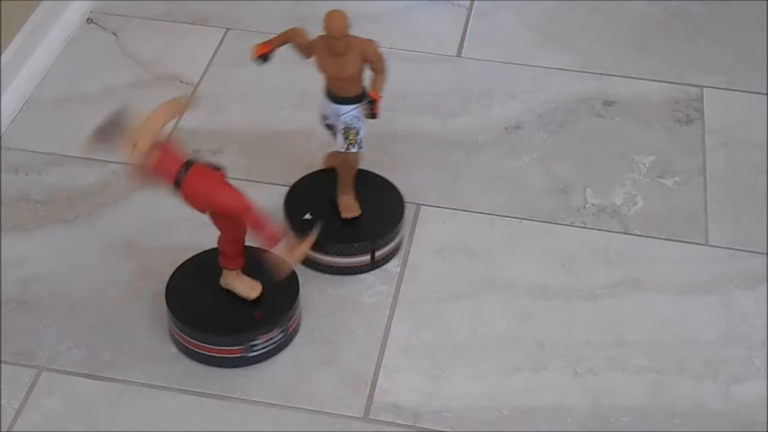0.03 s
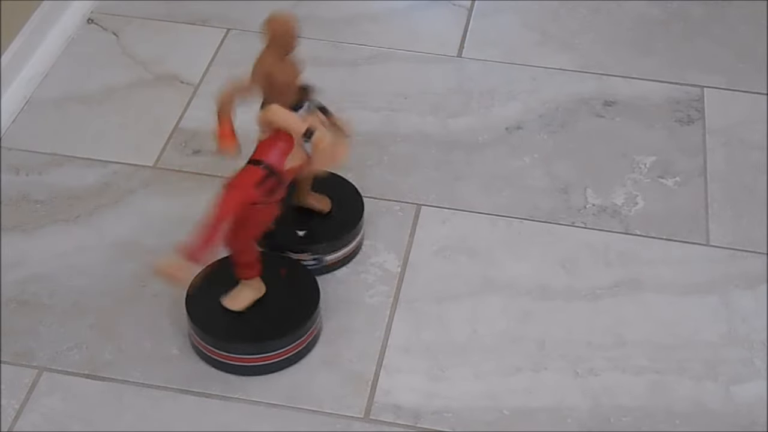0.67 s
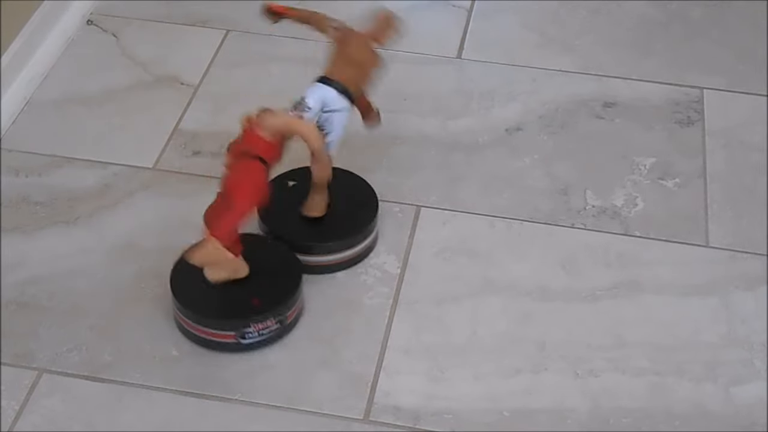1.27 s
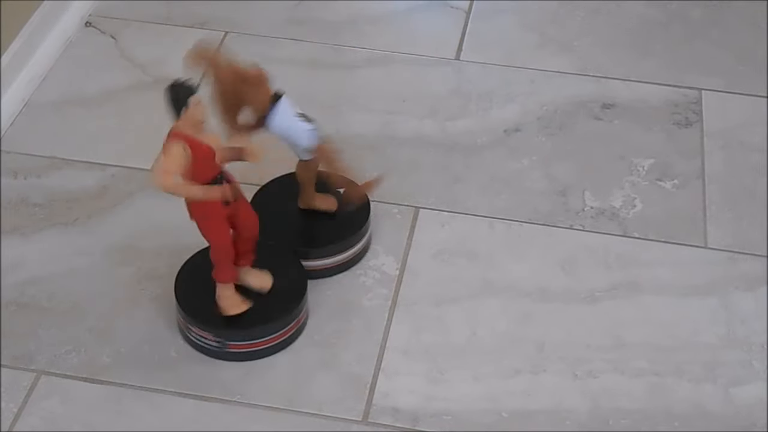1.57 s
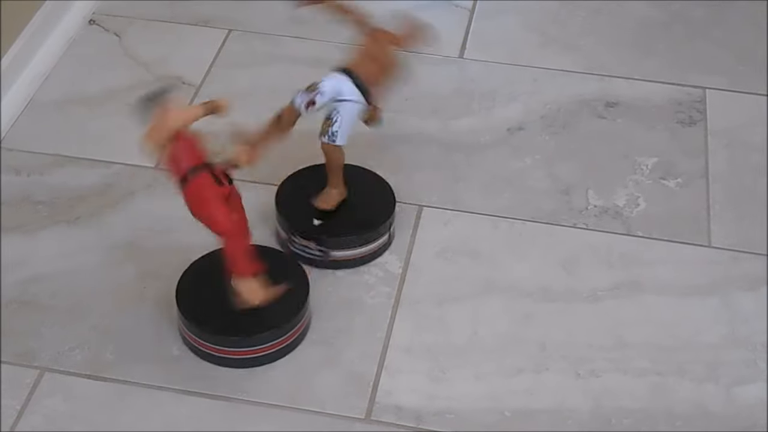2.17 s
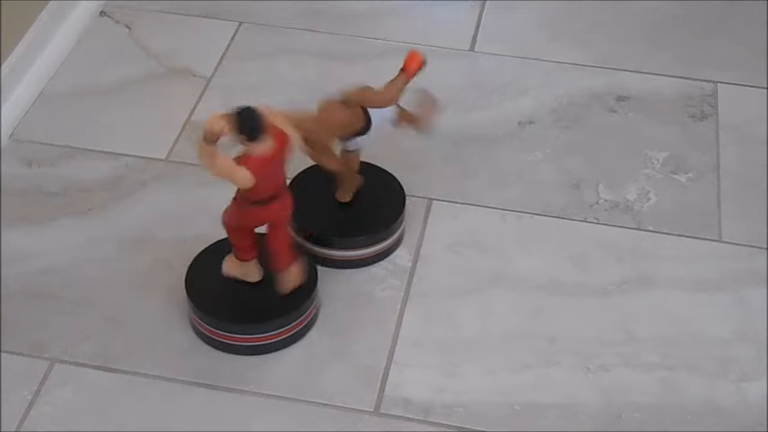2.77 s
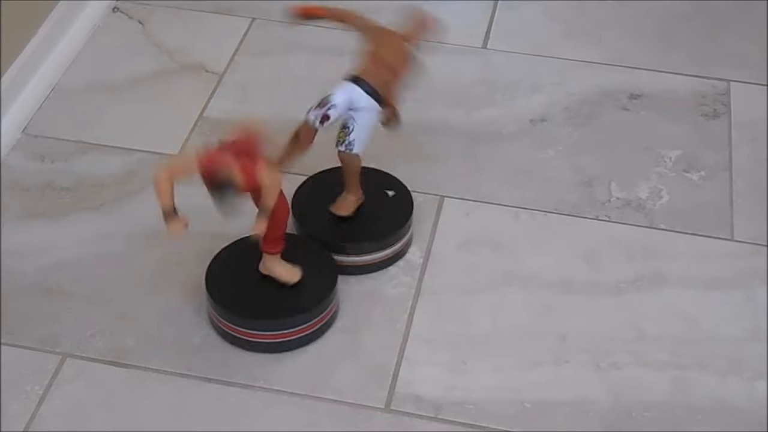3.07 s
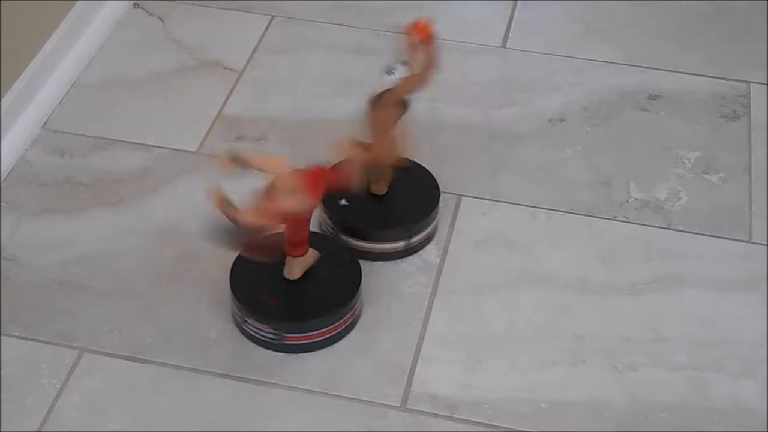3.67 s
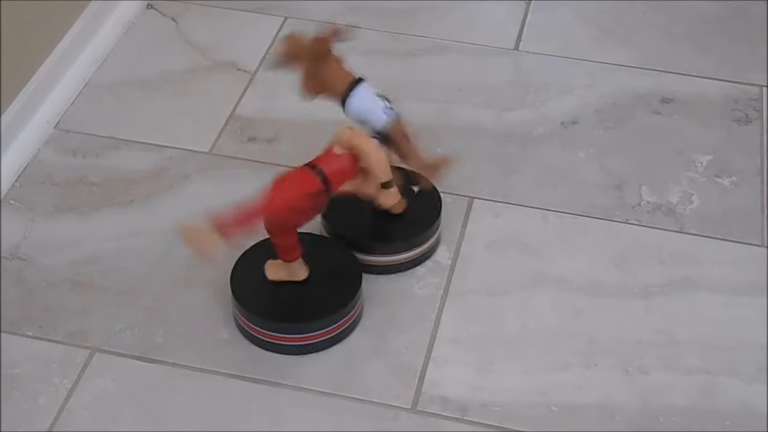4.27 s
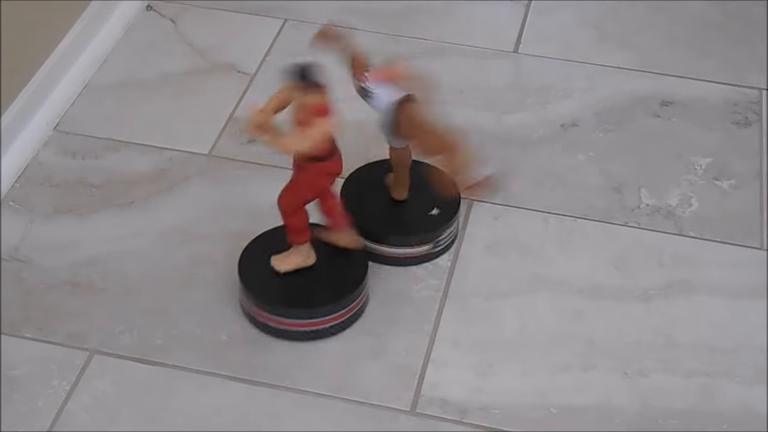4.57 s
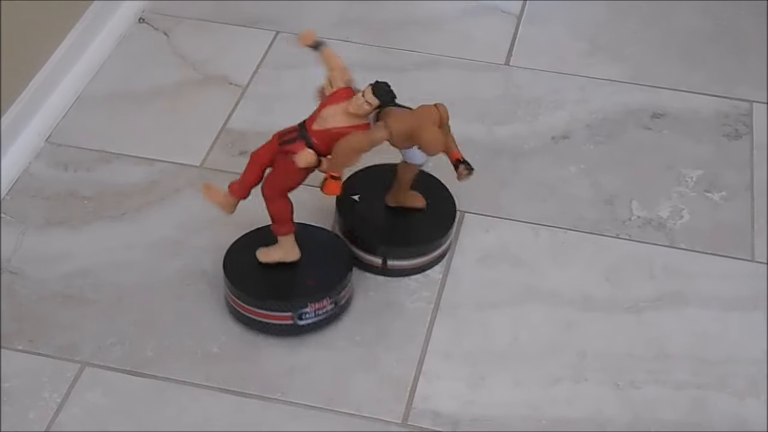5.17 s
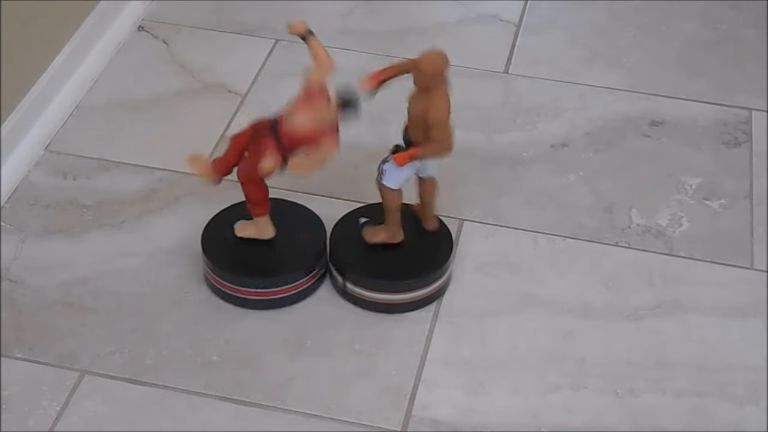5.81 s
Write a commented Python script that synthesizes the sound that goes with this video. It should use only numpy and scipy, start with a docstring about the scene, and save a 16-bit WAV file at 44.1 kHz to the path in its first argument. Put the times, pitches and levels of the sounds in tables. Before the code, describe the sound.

A fluttering whir of small motors and plastic gears runs throughout, with a thin whine and passing squeaks. Over it, two spinning toy figures strike each other with sharp, uneven clacks, and their rocking bases rattle and thud lightly on tile. Towards the end the motors strain briefly as the toys lock and scrape, then more clacks follow. Heard from nearby indoors, with a short room echo.

```python
"""Two motorised toy fighters spin on a tiled floor in a small hard room.
Their plastic gear teeth click fast enough to whir, rasp and whine; loaded meshes squeal.
The round bases chatter, rock and thud on the tiles. Limbs clack together and scrape.
When the figures lock, a jammed motor hums and sinks in pitch. A faint rumble lies beneath."""
import sys
import numpy as np
from scipy import signal
from scipy.fft import rfft, irfft
from scipy.io import wavfile

SR = 44100
rng = np.random.default_rng(int(sys.argv[2]) if len(sys.argv) > 2 else 0)


def pcm_store(signal):
    """Save signal as 16-bit PCM."""
    levels = np.round(np.clip(np.atleast_2d(signal), -1, 1) * 32767)
    wavfile.write(sys.argv[1], SR, levels.astype(np.int16).T)


N = 266540
TIME_S = np.arange(N) / SR

# hollow base resonances: centre_hz, width_hz, peak_db
BASE_MODES = [(237, 57, 9), (570, 50, 5), (645.4, 20, 6.5), (687, 26.43, 5), (830, 98, 4.5),
              (1047, 27, 9.5), (1178, 35, 7), (1410, 60, 11)]
# plastic limb spectrum: freq_hz, gain_db
LIMB_SPECTRUM = [(100, -37), (400, -16.5), (700, -4), (2000, 3), (4500, 1.5), (8000, -0.5), (11000, -5)]


def from_db(db):
    """Decibels to gain."""
    return 10 ** (np.asarray(db) / 20)


def unit_rms(x):
    """Scale to rms 1."""
    return x / np.sqrt(np.mean(x ** 2) + 1e-20)


def drift(rate_hz):
    """Smooth random wander, rms 1."""
    hop = 40
    pole = np.exp(-2 * np.pi * rate_hz * hop / SR)
    noise = rng.standard_normal(N // hop + 2002)
    slow = signal.lfilter([1], [1, -2 * pole, pole * pole], noise)[2000:]
    return np.interp(np.arange(N) / hop, np.arange(len(slow)), unit_rms(slow))


def body(x, spectrum, modes=(), size=8192):
    """Minimum-phase filter: broad spectrum plus resonances, unit power gain for white noise."""
    hz = np.maximum(np.fft.rfftfreq(size, 1 / SR), 1)
    freq_hz, gain_db = np.transpose(spectrum)
    db = np.interp(np.log(hz), np.log(freq_hz), gain_db)
    for centre_hz, width_hz, peak_db in modes:
        db += peak_db / (1 + (2 * (hz - centre_hz) / width_hz) ** 2)
    cepstrum = irfft(np.log(unit_rms(from_db(db))))
    cepstrum[1:size // 2] *= 2
    cepstrum[size // 2 + 1:] = 0
    return signal.fftconvolve(x, irfft(np.exp(rfft(cepstrum))))[:N]


def resonate(x, hz, width_hz):
    """Two-pole resonance, peak gain 1."""
    r = np.exp(-np.pi * width_hz / SR)
    feedback = [1, -2 * r * np.cos(2 * np.pi * hz / SR), r * r]
    return signal.lfilter(np.array([1, 0, -1]) * (1 - r * r) / 2, feedback, x)


def add(out, start_s, sound):
    """Mix in at start_s."""
    at = int(start_s * SR)
    out[at:at + len(sound)] += sound[:N - at]


def gate(start_s, length_s, edge_s):
    """Trapezoid envelope."""
    inside_s = np.minimum(TIME_S - start_s, start_s + length_s - TIME_S)
    return np.clip(inside_s / edge_s + .5, 0, 1)


def offsets_db(rows, edge_s):
    """Sum of timed level changes."""
    return sum(db * gate(start_s, length_s, edge_s) for start_s, length_s, db in rows)


def gear_teeth(uneven_db, wobble, friction, teeth=8):
    """Two motors click once a tooth, with loose timing, uneven force and sliding friction."""
    out = np.zeros(N)
    for motor_hz in (162.76, 211.1):
        turns = np.cumsum(motor_hz * (1 + .07 * drift(3))) / SR  # swinging figure loads the motor
        tooth = np.floor(turns * teeth + .2 * drift(400))  # backlash
        contact = np.diff(tooth, prepend=tooth[0]) > 0
        force = from_db(uneven_db * np.clip(rng.standard_normal(N), -2, 2))
        clicks = unit_rms(contact * force * rng.choice([-1, 1], N, p=[.35, .65]))
        out += (clicks + friction * rng.standard_normal(N)) * (1 + wobble * np.sin(2 * np.pi * turns))
    return unit_rms(out)


def turning(x, rate_hz, depth_db=6, bands=64, top_hz=10600):
    """A turning toy beams each band towards the listener and away, at random."""
    spectrum, hz = rfft(x), np.fft.rfftfreq(N, 1 / SR)
    position = np.sqrt(np.minimum(hz / top_hz, 1)) * (bands - 1)
    split = (irfft(spectrum * np.maximum(1 - abs(position - k), 0), N) for k in range(bands))
    return unit_rms(sum(band * from_db(depth_db * np.tanh(drift(rate_hz))) for band in split))


def whir(effort_db):
    """Tooth clicks ring the gearbox in the midrange."""
    # freq_hz, gain_db
    spectrum = [(200, -41.5), (600, -20), (1100, -8), (1450, -6.5), (1700, -5), (2500, -2.5), (3200, -11.5),
                (5000, -9.5), (11000, -14.5)]
    # centre_hz, width_hz, peak_db
    gearbox_modes = [(1730, 58, 4.5), (2160, 380, 3), (2740, 240, 4.5), (2990, 47, 10)]
    # easy running: time_s, level_db
    level_curve = [(0, -29), (.35, -26), (.8, -27), (1.33, -28), (1.62, -27.5), (1.74, -27), (2.0, -27.5),
                   (2.3, -28.5), (3.2, -27), (3.7, -26), (4.35, -24), (5.0, -29.5), (5.4, -26.5),
                   (6.04, -32)]
    level_db = np.interp(TIME_S, *np.transpose(level_curve)) + effort_db
    gears = body(gear_teeth(uneven_db=1, wobble=.17, friction=.54), spectrum, gearbox_modes)
    return from_db(level_db) * turning(gears, rate_hz=20.5)


def rasp(effort_db, easy_db=-25.5):
    """More uneven tooth clicks ring the shell in the treble."""
    # freq_hz, gain_db
    spectrum = [(500, -36), (2000, -11), (3200, -3.5), (4200, -0.5), (5800, -2.5), (7500, -3), (9300, -6),
                (11000, -8.5)]
    # centre_hz, width_hz, peak_db
    shell_modes = [(3860, 550, 2.6), (4790, 825.5, 2.9), (5330, 160, 1.8), (6420, 310, 4), (8510, 170, 6.9)]
    gears = body(gear_teeth(uneven_db=3, wobble=.13, friction=.37), spectrum, shell_modes)
    return from_db(easy_db + effort_db) * turning(gears, rate_hz=21)


def whine(effort_db, easy_db=-39, swell_db=5):
    """The fastest gear sings thinly, swelling now and then."""
    pitch_hz = 2640 + 30.19 * drift(5.5) + 32.1 * drift(335)  # load wander, backlash waver
    force = (1 + .79 * drift(60)) * from_db(swell_db * np.tanh(drift(14)))
    phase = 2 * np.pi * np.cumsum(pitch_hz) / SR
    return from_db(easy_db + effort_db) * unit_rms(force * np.sin(phase))


def shuffle(effort_db, standing_db=-43, taps_per_s=500, spread_db=3):
    """The bases chatter on the tile in tiny taps, louder in a skid."""
    # freq_hz, gain_db
    spectrum = [(100, -41.5), (220, -14), (400, -5.5), (500, 2.5), (600, 8), (1000, 3), (1500, -0.5),
                (3500, -12)]
    # start_s, length_s, rise_db
    skids = [(.16, 0.26, 0), (.97, 0.46, 5.5), (1.67, 0.51, 6), (2.4, 0.49, 1.5), (2.86, 0.17, 9),
             (3.31, 0.57, 4), (3.92, 0.2188, 4.5), (4.42, 0.44, 5), (5.18, 0.11, 8.5), (5.34, 0.43, 3)]
    level_db = standing_db + offsets_db(skids, edge_s=.0088) + effort_db
    contact = rng.random(N) < taps_per_s / SR
    force = from_db(spread_db * np.minimum(rng.exponential(1, N), 3))
    taps = contact * force * rng.choice([-1, 1], N)
    return from_db(level_db) * unit_rms(body(taps, spectrum, BASE_MODES))


def rumble(level_db=-50):
    """Faint, steady low noise."""
    # freq_hz, gain_db
    spectrum = [(15, -3), (28, -3.5), (43, 1), (70, -11.5), (120, -9.5), (170, -19.5), (300, -13.5),
                (1000, -27)]
    return from_db(level_db) * body(rng.standard_normal(N), spectrum)


def squeals():
    """A loaded mesh sings at its tooth rate, gliding and wavering as teeth catch and slip."""
    # start_s, length_s, from_hz, to_hz, waver_hz, level_db
    glides = [(0.0, 0.2, 1865, 2060, 170, -33.5), (0.217, 0.12, 2683, 2660, 30, -37),
              (0.553, 0.12, 4930, 4600, 65, -34), (0.738, 0.1, 2150, 2050, 70, -34),
              (0.85, 0.093, 2610, 2690, 35, -37), (1.272, 0.12, 4660, 4900, 50, -27.5),
              (1.319, 0.064, 4060, 4354, 45, -28), (1.29, 0.13, 6470, 6430, 60, -35),
              (1.553, 0.34, 2596, 2450, 91, -32.5), (1.9, 0.1003, 2550, 2010, 60, -34),
              (1.933, 0.057, 6500, 6480, 79, -25), (2.186, 0.066, 4163, 3950, 60, -26),
              (2.45, 0.046, 5000, 4950, 50, -30), (2.568, 0.15, 4480, 4750, 90, -32),
              (2.713, 0.08, 4740, 4690, 70.4, -26.5), (2.8, 0.083, 4620, 4420, 65, -29),
              (2.814, 0.08, 4200, 3900, 70, -36), (3.553, 0.46, 1830, 2066, 173, -31.5),
              (4.048, 0.38, 2037, 1745, 101, -34.5), (4.155, 0.2, 1400, 1130, 70, -35.5),
              (5.177, 0.075, 4592, 4550, 45, -20.5), (5.25, 0.0591, 4700, 4600, 60, -31),
              (5.567, 0.125, 6590, 6450, 80.7, -22.5), (5.59, 0.12, 2500, 2380, 71.5, -30),
              (5.638, 0.067, 4960, 4600, 130, -21.5), (5.711, 0.12, 2720, 2650, 68, -33),
              (5.843, 0.026, 6500, 6450, 60, -26), (5.942, 0.11, 4940, 4640, 190, -24),
              (5.947, 0.12, 4600, 4380, 150, -32)]
    out = np.zeros(N)
    waver, force = drift(253), 1 + .58 * drift(190)
    for start_s, length_s, from_hz, to_hz, waver_hz, level_db in glides:
        pitch_hz = np.interp(TIME_S, [start_s, start_s + length_s], [from_hz, to_hz]) + waver_hz * waver
        tone = unit_rms(force * np.sin(2 * np.pi * np.cumsum(pitch_hz) / SR))
        out += from_db(level_db) * gate(start_s, length_s, edge_s=.016) * tone
    return out


def clacks(gain_db=-15.5, ring_db=6.5, crack_t60_s=.02, contact_s=.0011, size=8000):
    """Limbs collide: a crack, sharper on hard blows; loose joints clatter and the limb rings."""
    # start_s, strength_db, ring_hz, clatter_t60_s
    blows = [(0.167, -5, 2050, .05), (0.291, -7, 2647, .04), (0.409, -1.5, 4740, 0.025),
             (0.95, -0.5, 3540, .04), (0.971, 0.5, 5200, .025), (0.984, 3, 5470, .01),
             (0.997, 4, 3280, 0.009), (1.027, -8, 4680, 0.032), (1.161, -8, 2600, 0.091),
             (1.217, -7, 4400, .02), (1.226, -6.5, 2690, 0.025), (1.686, -1, 1510, .02),
             (1.706, -3.5, 4800, .02), (1.86, -2, 4400, 0.03), (1.871, -1.5, 4550, 0.0189),
             (1.943, 1, 2480, 0.0087), (2.075, -4.5, 2610, .025), (2.139, 0.5, 2600, 0.02),
             (2.357, -4, 2420, 0.033), (2.44, -3, 3400, 0.045), (2.447, -2, 4000, 0.05),
             (2.824, -20, 4630, 0.014), (2.889, -1.5, 1810, 0.034), (2.923, -2.5, 3960, 0.025),
             (3.052, -4.5, 4300, 0.047), (3.307, -6, 2130, .04), (3.369, -0.5, 2100, 0.043),
             (3.383, -0.5, 2900, 0.041), (3.442, -5, 4200, .03), (3.585, 3, 2017, 0.026),
             (3.594, -5, 4200, 0.078), (3.925, -1, 2180, 0.024), (4.11, -4.5, 4180, 0.019),
             (4.393, 1, 4560, 0.015), (4.396, -2, 2640, 0.048), (4.417, -3, 1400, 0.0359),
             (4.444, -5, 4220, .03), (4.536, -3, 2700, .025), (4.639, -5.5, 1790, .03),
             (4.691, -3, 1720, 0.033), (4.769, -2, 4000, 0.011), (4.854, -2.5, 2400, 0.097),
             (4.899, -2, 4600, .025), (5.174, -1, 4600, 0.033), (5.568, -11, 5300, .015),
             (5.658, -1, 4730, .02), (5.687, 4, 4800, 0.03), (5.696, 1, 4540, 0.024),
             (5.838, -3, 1810, 0.04), (5.852, -3.5, 6600, .04), (5.906, -8, 4630, .03)]
    out, age_s = np.zeros(N), np.arange(size) / SR
    for start_s, strength_db, ring_hz, clatter_t60_s in blows:
        crack = from_db(6 + .7 * min(strength_db, 1) - 60 * age_s / crack_t60_s)
        joints = from_db(-60 * age_s / clatter_t60_s)
        clatter = rng.choice([-1, 1], size) * (crack + joints) * np.minimum(age_s / contact_s, 1)
        ring = from_db(ring_db) * resonate(clatter, ring_hz, width_hz=156)
        add(out, start_s, from_db(strength_db + gain_db) * (clatter + ring))
    return body(out, LIMB_SPECTRUM)


def thumps(gain_db=-8, width_hz=88, rattle_db=.5, rattle_t60_s=.075, size=8000):
    """A rocking rim lands; the hollow base rings and its insides rattle."""
    # freq_hz, gain_db
    spectrum = [(80, -48), (250, -23.5), (430, -9.5), (600, -4.5), (1000, -1.5), (1800, -4), (5000, -10.5)]
    # start_s, strength_db, ring_hz
    landings = [(0.192, -25, 750), (0.264, -21.5, 600), (0.982, -13, 667), (1.023, -16.5, 840),
                (1.045, -18.5, 705), (1.214, -25, 583), (1.39, -21, 1050), (1.826, -25, 780),
                (1.885, -18.5, 657), (1.942, -16.5, 740), (2.036, -14.5, 746), (2.079, -17.5, 1089),
                (2.142, -25, 840), (2.44, -21.5, 666), (2.888, -32, 840), (3.307, -21, 910),
                (3.37, -18, 730), (3.398, -12.5, 680), (3.412, -24, 610), (3.538, -18.5, 764),
                (3.755, -14, 750), (3.958, -23.5, 730), (4.397, -8, 985), (4.419, -31, 1060),
                (4.515, -20, 596), (4.857, -19.5, 880), (5.36, -13, 646), (5.427, -24, 1010),
                (5.69, -17, 880), (5.838, -13.5, 764)]
    out, age_s = np.zeros(N), np.arange(size) / SR
    for start_s, strength_db, ring_hz in landings:
        ring = np.sin(2 * np.pi * ring_hz * age_s) * np.exp(-np.pi * width_hz * age_s)
        rattle = rng.standard_normal(size) * from_db(rattle_db - 60 * age_s / rattle_t60_s)
        add(out, start_s, from_db(strength_db + gain_db) * (ring + rattle))
    return body(out, spectrum, BASE_MODES)


def thuds(pitch_hz=247, width_hz=82, shudder_t60_s=.06, size=8000):
    """A toy's whole weight settles on the floor: a dull knock and a brief shudder."""
    # start_s, strength_db
    landings = [(1.025, -52), (1.69, -44), (2.14, -41), (3.385, -33), (4.398, -49), (4.857, -38),
                (5.21, -42), (5.234, -40), (5.419, -43), (5.692, -41)]
    out, age_s = np.zeros(N), np.arange(size) / SR
    ring = np.sin(2 * np.pi * pitch_hz * age_s) * np.exp(-np.pi * width_hz * age_s)
    knock = resonate(ring, pitch_hz, width_hz=pitch_hz)
    for start_s, strength_db in landings:
        noise = resonate(rng.standard_normal(size), pitch_hz, 2 * width_hz)
        shudder = unit_rms(resonate(noise, pitch_hz, 2 * width_hz)) * from_db(-60 * age_s / shudder_t60_s)
        add(out, start_s, from_db(strength_db) * (2 * knock + .56 * shudder))
    return out


def scrapes(slips_per_s=5000):
    """Limb drags over limb; the plastic sticks and slips in dense ticks."""
    # start_s, length_s, level_db
    drags = [(2.451, 0.051, -23.5), (3.563, .045, -36), (5.201, 0.034, -16), (5.352, 0.029, -22),
             (5.833, 0.011, -21)]
    slips = (rng.random(N) < slips_per_s / SR) * rng.choice([-1, 1], N)
    pressure = sum(from_db(db) * gate(start_s, length_s, edge_s=.006) for start_s, length_s, db in drags)
    return pressure * unit_rms(body(slips, LIMB_SPECTRUM))


def jam_hum(octave_db=-.5):
    """A motor slows in a jam; its hum shakes and sinks."""
    # start_s, length_s, from_hz, to_hz, level_db
    jams = [(5.166, 0.099, 301.7, 272, -42.5), (5.828, 0.11, 393, 356, -40)]
    out = np.zeros(N)
    for start_s, length_s, from_hz, to_hz, level_db in jams:
        glide_hz = np.interp(TIME_S, [start_s, start_s + length_s], [from_hz, to_hz])
        phase = 2 * np.pi * np.cumsum(glide_hz * (1 + .0208 * drift(69))) / SR
        hum = (np.sin(phase) + from_db(octave_db) * np.sin(2 * phase)) * (1 + .36 * drift(55))
        out += from_db(level_db) * gate(start_s, length_s, edge_s=.018) * unit_rms(hum)
    return out


def room(x, wet_db, t60_s=.18, delay_s=.004, size=20000):
    """Tiles and walls return a short dense tail."""
    age_s = np.arange(size) / SR
    tail = rng.standard_normal(size) * from_db(-60 * age_s / t60_s) * (age_s > delay_s)
    return x + from_db(wet_db) * signal.fftconvolve(x, unit_rms(tail) / np.sqrt(size))[:N]


def scene():
    """Motor effort sets gear and base levels; impacts land on top, with more reverb."""
    # motors pushed: start_s, length_s, rise_db
    surges = [(.44, 0.27, 2.5), (.925, 0.051, 7), (1.37, 0.42, 3.5), (1.84, 0.19, 5), (2.19, 0.082, 3),
              (2.42, 0.22, 4), (2.7, 0.1, 3.5), (2.81, 0.2, 6.5), (3.01, 0.19, 1.8), (3.5, 0.19, 5.5),
              (3.98, 0.12, 3), (4.52, 0.0576, 3), (4.78, 0.13, 2.5), (4.99, 0.1366, 2.5), (5.19, 0.37, 3.5),
              (5.57, 0.15, 8), (5.93, 0.094, 6)]
    # motors let go: start_s, length_s, change_db
    lulls = [(.34, 0.059, -1.5), (.65, 0.083, -6), (1.07, 0.14, -6.5), (3.16, 0.066, -2.5),
             (4.72, 0.074, -1), (5.105, 0.074, -3), (5.75, 0.055, -5.5)]
    surge_db, lull_db = offsets_db(surges, edge_s=.052), offsets_db(lulls, edge_s=.02)
    gears = whir(.43 * surge_db + lull_db) + rasp(surge_db + lull_db) + whine(lull_db)
    gears *= from_db(.8 * drift(33))  # load flutter
    running = gears + shuffle(.31 * lull_db) + squeals() + jam_hum() + scrapes()
    impacts = clacks() + thumps() + thuds()
    return (rumble() + room(running, wet_db=-12) + room(impacts, wet_db=-5))[None]


def record(dry, ceiling=.86, cutoff_hz=10300):
    """Soft clip, then steep low-pass."""
    rounded = ceiling * np.tanh(dry / ceiling)
    return signal.sosfilt(signal.butter(32, cutoff_hz, fs=SR, output="sos"), rounded)


dry = scene()
out = record(dry)
pcm_store(out)
```